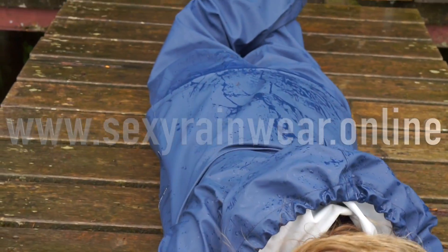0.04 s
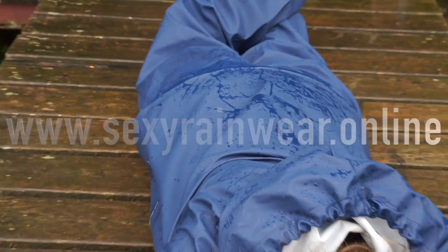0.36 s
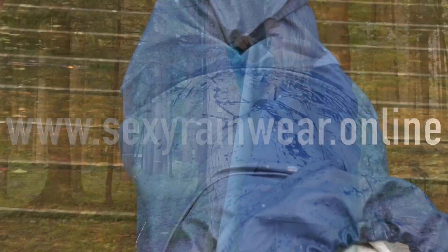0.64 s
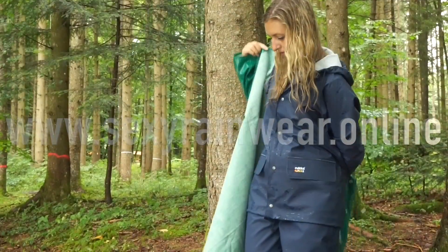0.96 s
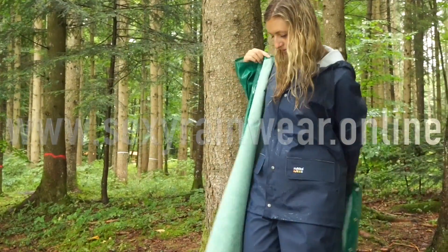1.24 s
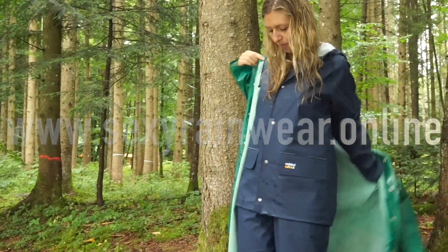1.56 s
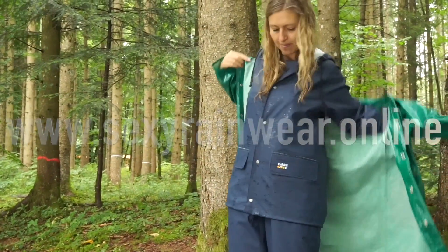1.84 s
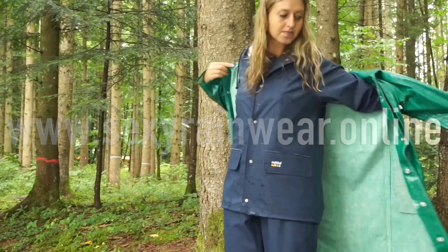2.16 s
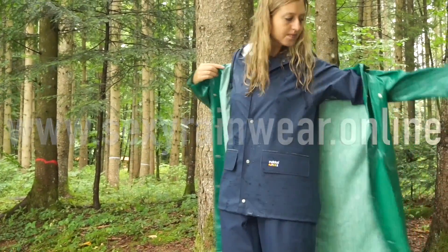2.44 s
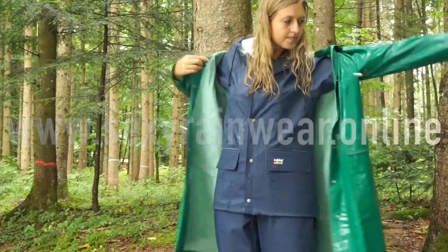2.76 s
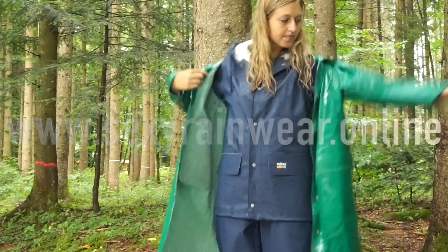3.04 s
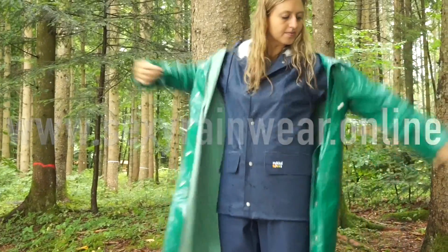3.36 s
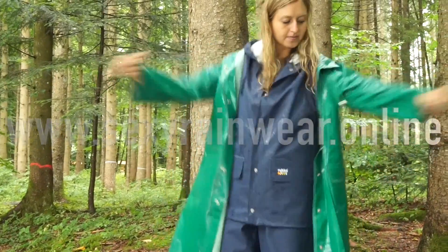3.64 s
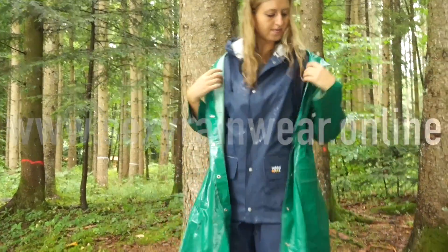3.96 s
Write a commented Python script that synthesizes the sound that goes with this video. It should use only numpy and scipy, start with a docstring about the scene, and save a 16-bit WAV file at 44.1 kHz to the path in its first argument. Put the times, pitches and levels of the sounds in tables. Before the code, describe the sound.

Close by, stiff waterproof fabric swishes and crinkles as a raincoat is put on. Arms push through sleeves, drops and fasteners tick, and the loose coat slaps three times. Fine rain falls evenly in the surrounding woods.

```python
"""Raincoat in a rainy forest

Light rain hisses among the trees while, close to a microphone pair, someone pulls a rubberised
raincoat over a rain jacket. The cloth crumples and slides in swells, creases snap, drops and fasteners
tick, and the loose coat slaps three times. An arm sounds the hollow of a sleeve; a press stud clinks.
The right side of the pair is duller and shifted in phase."""
import sys
import numpy as np
from scipy import signal
from scipy.fft import rfft, irfft
from scipy.io import wavfile
from scipy.ndimage import uniform_filter1d

SR = 44100
rng = np.random.default_rng(int(sys.argv[2]) if len(sys.argv) > 2 else 0)


def put_to_file(sound):
    """Save the sound as 16-bit audio at rate SR, in the file named by the first command-line argument."""
    columns = np.atleast_2d(sound).T  # one column per channel
    safe = np.clip(columns, -1, 1)
    whole_steps = np.round(safe * 32767)
    wavfile.write(sys.argv[1], SR, whole_steps.astype(np.int16))


N = 176400
CLICK_SAMPLES = 4096
HZ, CLICK_HZ = np.fft.rfftfreq(N, 1 / SR), np.fft.rfftfreq(CLICK_SAMPLES, 1 / SR)

# Spectrum of each source: f/Hz, relative level/dB
RAIN_SPECTRUM = [(25, -39), (200, -24.5), (850, -4), (1500, -5.5), (2000, -9), (4500, -9.5), (7500, -15),
                 (15500, -18)]
CRUMPLE_SPECTRUM = [(25, -26.5), (80, -38), (170, -15.5), (400, -0.5), (800, 2.5), (1300, -5), (2000, -14),
                    (16000, -52)]
SLIDE_SPECTRUM = [(100, -27), (900, 0.5), (2600, 3), (3500, -1), (5200, 1.5), (7500, -2.5), (10000, -0.5),
                  (15500, -4.5)]
CREASE_SPECTRUM = [(60, -60), (250, -7.5), (1000, 7.5), (2700, 2), (6000, -5), (16000, -12.5)]
TICK_SPECTRUM = [(100, -28), (700, -18), (6000, 13.5), (16000, 13)]
SLAP_SPECTRUM = [(40, -68), (150, -19.5), (310, -4.5), (750, 1), (2000, -10.5), (5800, -16.5),
                 (8500, -22.5), (16000, -24)]
# Swells of cloth crumpling and of cloth sliding on cloth: t/s, level/dB
CRUMPLE_SWELLS = [(.22, -66), (.26, -57), (.7, -63.5), (1.25, -58), (1.82, -52), (1.935, -47.5),
                  (2.01, -43.5), (2.1, -63), (2.24, -55), (2.5, -63.5), (2.69, -54), (2.84, -65),
                  (2.93, -56.5), (3.16, -61), (3.25, -53.5), (3.52, -57), (3.74, -55.5), (3.79, -52.5),
                  (4, -52)]
SLIDE_SWELLS = [(.22, -62), (.29, -52.5), (.6, -58), (.87, -51.5), (1.25, -52.5), (1.63, -45.5),
                (1.83, -48.5), (2.0, -41), (2.1, -54.5), (2.23, -51), (2.54, -50), (2.62, -44),
                (2.71, -42.5), (2.85, -53.5), (2.92, -46.5), (3.28, -51.5), (3.38, -55.5), (3.53, -46.5),
                (3.6, -51), (3.8, -47), (4, -51.5)]
# Creases snapping: t/s, relative level/dB, treble/dB, shiver/dB (low is a clean pop, high a rasp)
CREASE_SNAPS = [(0.2384, -46.5, -28, -3), (.568, -47, 1, 13), (0.7747, -41.5, 0, 5), (1.048, -44.5, 22, 11),
                (1.2989, -37.5, 2, -19), (1.3373, -37, -1, -2), (1.362, -40, -13, -19),
                (1.386, -44, -29, -1), (1.508, -52, -29, -3), (1.7733, -34, 0, 0), (1.9295, -39, -17, -2),
                (1.9955, -34, 20, -7), (2.006, -36.5, -14, -16), (2.023, -51, 5, 0), (2.3736, -39.5, 42, 6),
                (3.7647, -44.5, -28, -19), (3.780, -42, -19, 25), (3.8246, -44.5, -27, -27)]
# Drops and fasteners striking the coat: t/s, relative level/dB, ring f/Hz
COAT_TICKS = [(0.4584, -50, 11500), (0.6886, -53.5, 4530), (0.8447, -40, 12000), (0.924, -44.5, 12900),
              (.9915, -49, 14200), (1.006, -48, 12500), (1.3261, -45, 12600), (1.481, -43, 12900),
              (1.5537, -30, 5840), (1.5548, -41.5, 3150), (1.5555, -35.5, 8100), (2.0535, -43, 12200),
              (2.2868, -39, 11200), (2.426, -46, 12500), (2.8808, -47.5, 13700), (3.625, -46, 11500)]
# Loose coat slapping taut three times; the last row is the third slap's ground echo:
# t/s, relative level/dB, treble/dB, ring f/Hz, ring lift/dB
SLAPS_AND_ECHO = [(1.1475, -27.5, 2, 1200, 7.5), (1.9440, -31.5, -11, 610, -2),
                  (3.3241, -24.5, 1, 1540, 6.5), (3.3328, -41.5, -9, 1490, 12)]
# Hollow of the sleeve as the arm pushes in: t/s, resonance f/Hz, level/dB
SLEEVE_HOLLOW = [(1.609, 850, -60), (1.662, 395, -50.5), (1.70, 860, -60), (1.755, 560, -52.5),
                 (1.871, 910, -58), (1.89, 1340, -45), (1.95, 1210, -50)]
# Modes of the press stud: f/Hz, level/dB
STUD_RING = [(2550, -32), (3450, -31.5)]
# Likeness of the two microphones: f/Hz, shared fraction of power
PAIR_LIKENESS = [(40, .1), (150, 0.55), (900, 0.93), (2000, 0.64), (8000, 0.13)]
# Balance of the pair: f/Hz, left over right/dB
PAIR_BALANCE = [(550, 1.3), (2400, 4.7), (6000, 10.3), (15000, 10.1)]
# Phase of the pair: f/Hz, lead of the right side/rad
RIGHT_LEAD = [(40, .1), (400, 1.56), (1000, 1.84), (15000, 1.63)]


def amp(db):
    """Decibels to gain."""
    return 10 ** (np.asarray(db) / 20)


def unit(x):
    """Scales to rms 1."""
    return x / np.sqrt(np.mean(x ** 2) + 1e-20)


def read(points, hz):
    """Reads a spectrum table on a log-frequency axis."""
    f, value = np.transpose(points)
    return np.interp(np.log(hz + 1), np.log(f + 1), value)


def add(mix, s, sound):
    """Adds a sound to both channels at time s."""
    part = mix[:, round(s * SR):][:, :sound.shape[1]]
    part += sound[:, :part.shape[1]]


def minimum_phase(gain):
    """Spectrum of the quickest click with the given magnitudes."""
    log_gain = np.log(np.maximum(gain / gain.max(), 1e-5))
    mirrored = np.r_[log_gain, log_gain[-2:0:-1]]
    return gain.max() * np.exp(np.conj(signal.hilbert(mirrored)))[:len(gain)]


def wander(rate_hz):
    """Slow random curve of rms 1."""
    return unit(irfft(rfft(rng.standard_normal(N)) / (1 + (HZ / rate_hz) ** 2), N))


def grains(spectrum, per_s, spread_db, hiss_share):
    """Tiny clicks over a smooth hiss, partly shared by both microphones."""
    shape = (3, N)  # shared, left, right
    clicks = (rng.random(shape) < per_s / SR) * rng.choice([-1, 1], shape)
    sizes = amp(spread_db * np.minimum(rng.exponential(1, shape), 4))
    hiss = rng.standard_normal(shape)
    texture = rfft(np.sqrt(1 - hiss_share) * unit(clicks * sizes) + np.sqrt(hiss_share) * hiss)
    likeness = read(PAIR_LIKENESS, HZ)
    pair = np.sqrt(likeness) * texture[0] + np.sqrt(1 - likeness) * texture[1:]
    return unit(irfft(pair * minimum_phase(amp(read(spectrum, HZ))), N))


def click(colour, shiver_s, shiver_db, tail_s, tail_db, lag_s, lag_corner_hz=2500):
    """One snap, a brief shiver of cloth and a faint scatter from the surroundings, in one colour."""
    t = np.arange(CLICK_SAMPLES) / SR
    shiver = rng.standard_normal(len(t)) * np.exp(-t / shiver_s) * (1 - np.exp(-2 * t / shiver_s))
    tail = rng.standard_normal((2, len(t))) * np.exp(-t / tail_s)
    drive = (t == 0) + amp(shiver_db) * shiver / np.linalg.norm(shiver)
    drive = drive + amp(tail_db) * tail / np.linalg.norm(tail[0])
    # Bending waves carry the bass more slowly than the treble
    lag = np.exp(-2j * np.pi * lag_s * lag_corner_hz * np.log1p(CLICK_HZ / lag_corner_hz))
    response = irfft(minimum_phase(unit(colour)) * lag)
    return signal.fftconvolve(drive / np.linalg.norm(drive[0]), response[None], axes=1)


def resonance(hz, q, lift_db):
    """Gain curve of one resonance in a click."""
    return 1 + amp(lift_db) / np.hypot(1, q * (CLICK_HZ / hz - hz / (CLICK_HZ + 1)))


def treble_shelf(db, corner_hz=1500):
    """Gain curve that brightens or dulls a click."""
    return amp(db * CLICK_HZ / (CLICK_HZ + corner_hz))


def rain(level_db=-52.5):
    """Fine, even rain on the leaves and ground all around."""
    patter = grains(RAIN_SPECTRUM, per_s=500, spread_db=0, hiss_share=0.87)
    return amp(level_db + .5 * wander(rate_hz=6)) * patter


def rustle():
    """Close up, the coat crumples in coarse low grains and slides in fine bright ones, both unevenly."""
    t = np.arange(N) / SR
    crumple_db = np.interp(t, *np.transpose(CRUMPLE_SWELLS)) + 2.6 * wander(rate_hz=45)
    crumple = grains(CRUMPLE_SPECTRUM, per_s=350, spread_db=3, hiss_share=0.57)
    slide_db = np.interp(t, *np.transpose(SLIDE_SWELLS)) + 1.29 * wander(rate_hz=20)
    slide = grains(SLIDE_SPECTRUM, per_s=2500, spread_db=5.5, hiss_share=0.63)
    return amp(crumple_db) * crumple + amp(slide_db) * slide


def shifting_folds(sound, depth_db):
    """Folds change shape, so narrow peaks and dips drift through the sound."""
    frames = signal.stft(sound, nperseg=1024, noverlap=768)[2]
    drift = rng.standard_normal(frames.shape[1:])
    for _ in range(2):
        drift = uniform_filter1d(drift, size=6, axis=0)  # across frequency
        drift = uniform_filter1d(drift, size=11, axis=1)  # across time
    gain = unit(amp(depth_db * unit(drift)))
    return signal.istft(frames * gain, nperseg=1024, noverlap=768)[1][:, :N]


def creases(gain_db=26):
    """Stiff folds pop through, cleanly or with a rasp, each with its own share of treble."""
    out = np.zeros((2, N))
    for s, db, treble_db, shiver_db in CREASE_SNAPS:
        colour = amp(read(CREASE_SPECTRUM, CLICK_HZ)) * treble_shelf(treble_db)
        pop = click(colour, shiver_s=.002, shiver_db=shiver_db, tail_s=.007, tail_db=-9, lag_s=.0003)
        add(out, s, amp(db + gain_db) * pop)
    return out


def ticks(gain_db=28):
    """Drops and fasteners strike the coat in bright ticks with a very short ring."""
    out = np.zeros((2, N))
    for s, db, hz in COAT_TICKS:
        colour = amp(read(TICK_SPECTRUM, CLICK_HZ)) * resonance(hz, q=8, lift_db=21)
        tick = click(colour, shiver_s=.0007, shiver_db=0, tail_s=.004, tail_db=-6, lag_s=.0007)
        add(out, s, amp(db + gain_db) * tick)
    return out


def slaps(gain_db=28, flutter_db=-28, flutter_s=0.079, flutter_hz=220):
    """The coat pulls taut with a dull, ringing crack, then flutters; the third echoes off the ground."""
    out, t = np.zeros((2, N)), np.arange(SR // 4) / SR
    band = signal.butter(2, [flutter_hz / 2, flutter_hz * 2], "band", fs=SR, output="sos")
    for s, db, treble_db, hz, ring_db in SLAPS_AND_ECHO:
        ring = resonance(hz, q=12, lift_db=ring_db) * resonance(2 * hz, q=12, lift_db=ring_db - 4)
        colour = amp(read(SLAP_SPECTRUM, CLICK_HZ)) * treble_shelf(treble_db) * ring
        crack = click(colour, shiver_s=.0011, shiver_db=-3, tail_s=.007, tail_db=-10, lag_s=.0009)
        add(out, s, amp(db + gain_db) * crack)
        flutter = unit(signal.sosfilt(band, rng.standard_normal(len(t)))) * np.exp(-t / flutter_s)
        add(out, s, amp(db + flutter_db) * flutter[None])
    return out


def sleeve(width_hz=110):
    """Friction sounds the hollow of the sleeve, whose pitch moves as it opens and folds."""
    t = np.arange(N) / SR
    s, hz, db = np.transpose(SLEEVE_HOLLOW)
    carrier = np.exp(2j * np.pi * np.cumsum(np.interp(t, s, hz)) / SR)
    pole = np.exp(-np.pi * width_hz / SR)
    friction = rng.standard_normal(N)
    hollow = carrier * signal.lfilter([1], np.poly([pole, pole]), friction / carrier)
    swell = uniform_filter1d(np.interp(t, s, amp(db), left=0, right=0), size=400)
    return unit(hollow.real) * swell


def stud(at_s=2.2868, t60_s=0.021):
    """A metal press stud clinks once, ringing briefly in two modes."""
    out, t = np.zeros((2, N)), np.arange(CLICK_SAMPLES) / SR
    ring = sum(amp(db) * np.cos(2 * np.pi * hz * t) for hz, db in STUD_RING)
    decay = np.exp(-np.log(1000) * t / t60_s)
    add(out, at_s, (ring * decay)[None])
    return out


def scene():
    """Forest rain all around, the moving raincoat close by."""
    wash = shifting_folds(rain() + rustle(), depth_db=1.9)
    return wash + sleeve() + slaps() + creases() + ticks() + stud()


def record(dry):
    """A close microphone pair: the right is duller and leads in phase; both cut off near 16 kHz."""
    right_gain = amp(-read(PAIR_BALANCE, HZ))
    right = right_gain * np.exp(1j * read(RIGHT_LEAD, HZ))
    equal_power = np.sqrt(2 / (1 + right_gain ** 2))
    pair = np.array([np.ones(len(HZ)), right]) * equal_power
    lowpass = signal.firwin(511, 15950, window=("kaiser", 9), fs=SR)
    return signal.oaconvolve(irfft(rfft(dry) * pair, N), lowpass[None], "same")


dry = scene()
out = record(dry)
put_to_file(out)
```